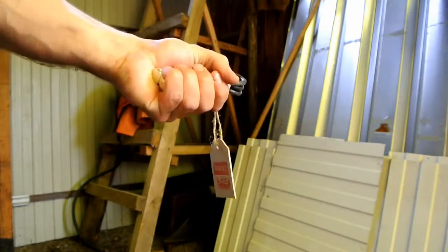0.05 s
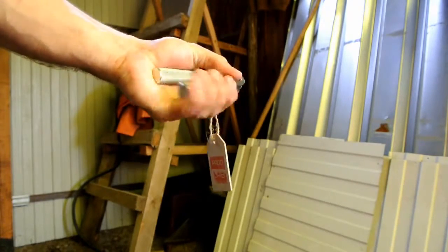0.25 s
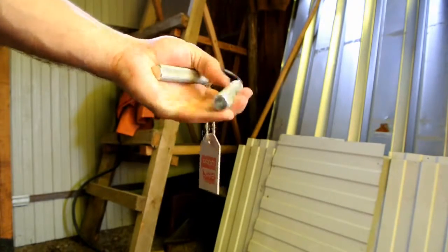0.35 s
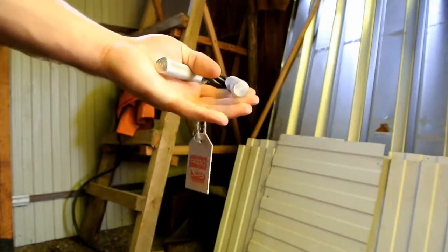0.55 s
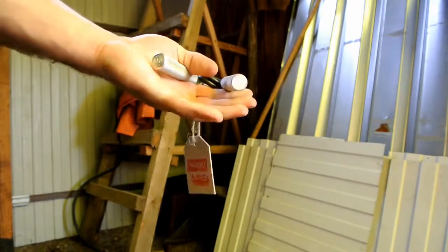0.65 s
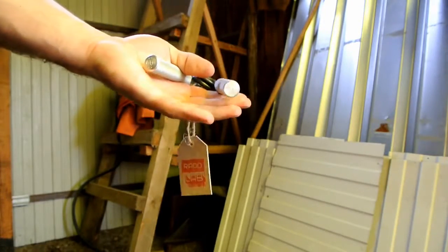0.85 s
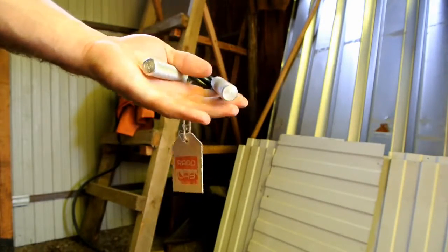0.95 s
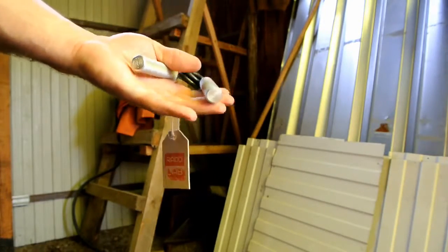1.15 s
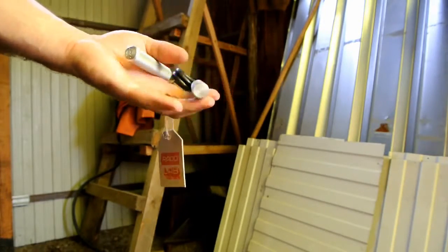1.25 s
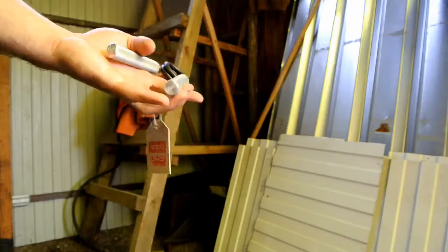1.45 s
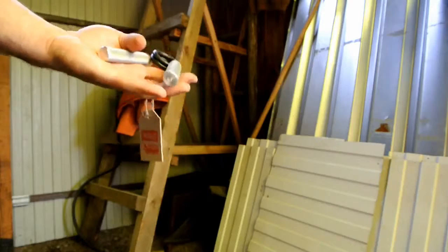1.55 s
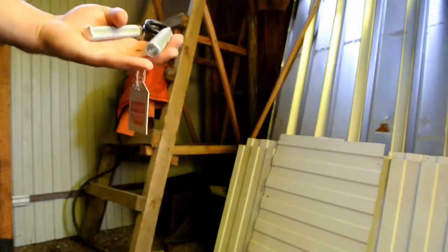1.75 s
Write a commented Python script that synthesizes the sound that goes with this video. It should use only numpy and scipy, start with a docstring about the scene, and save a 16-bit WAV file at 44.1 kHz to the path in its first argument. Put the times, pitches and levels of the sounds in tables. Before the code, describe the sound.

A metal hand gripper snaps once, sharp and close to the microphone, then its spring scrapes briefly and a handle ticks. A duller knock follows farther off in a quiet shed, over soft air and a low hum.

```python
"""A soft wash of air and a low wavering hum fill a quiet shed. Close to the microphone a metal
hand gripper is let go: a handle ticks, the spring snaps once sharply, then scrapes in tiny slips
as the handles open with a fainter tick. Farther off, a duller knock sets a body ringing and
dies away. Last come two faint, thin squeaks as the gripper shifts on the palm."""
import sys
import numpy as np
from scipy import signal
from scipy.fft import rfft, irfft
from scipy.io import wavfile
from scipy.ndimage import uniform_filter1d

SR = 44100
rng = np.random.default_rng(int(sys.argv[2]) if len(sys.argv) > 2 else 0)


def output_pcm(signal):
    """Save a mono or channel-first signal as 16-bit PCM at the path in sys.argv[1].

    Samples are clipped to [-1, 1] before scaling.
    """
    pcm = np.clip(np.atleast_2d(signal).T, -1, 1) * 32767
    wavfile.write(sys.argv[1], SR, np.round(pcm).astype(np.int16))


N = 79380
T = np.arange(N) / SR

# Spectra of the air, the shed's tail and each source. Each row: frequency in Hz, relative level in dB.
AIR_COLOUR = [(20, -3.5), (45, -8.5), (85, -9), (150, -13), (210, -10.5), (290, -4.5), (380, -12),
              (560, -7.5), (800, -9.5), (1200, -13.5), (2400, -21), (5000, -22.5), (8000, -24),
              (14500, -24.5), (16000, -31)]
SHED_COLOUR = [(200, 13), (3000, -6.5), (5500, 4.5), (8500, -4), (12000, -8), (16000, -3.5)]
CLATTER_COLOUR = [(60, -25), (120, -16), (190, -4.5), (330, -4), (480, 0.5), (680, -1.5), (1120, -8.5),
                  (1560, -2.5), (3100, -5.5), (5400, -13.5), (7500, -17), (13000, -23), (16000, -33)]
CRACK_COLOUR = [(200, -4), (700, -24), (1150, -19), (1600, 1), (2400, -4), (3100, 8.5), (4200, 1.5),
                (6000, -9), (9000, -25), (13000, -17), (16000, -28)]
SCRAPE_COLOUR = [(300, -24), (900, -22), (1300, -16), (1550, -19), (1950, -11), (3100, -19), (4300, -13.5),
                 (5600, -13), (6900, -3), (9800, -3), (12800, 3), (16000, -6)]
TICK_COLOUR = [(200, -35), (1000, -5), (1700, 6), (2400, 4), (3300, 2), (5500, -30), (16000, -39)]
SNAP_COLOUR = [(200, -32), (1400, -24.5), (3800, -15), (6200, -16), (8600, -2), (12500, 4), (16000, -5)]
# Stereo image at the microphone. Each row: frequency in Hz, left-right likeness from 0 to 1.
AIR_LIKENESS = [(40, 0.74), (300, 0.7), (700, 0.7), (1500, 0.26), (4000, 0.12), (15000, 0.1)]
SHED_LIKENESS = [(200, 1), (2000, .4), (8000, 0.078), (16000, .1)]
KNOCK_LIKENESS = [(100, .95), (300, 0.98), (640, 0.92), (1400, 0.74), (3100, 0.38), (7000, 0), (15000, 0)]
# Decay of the shed's tail and the knock's clatter. Each row: frequency in Hz, seconds to fall 60 dB.
SHED_T60 = [(200, 0.53), (2000, 0.25), (8000, 0.21), (16000, 0.12)]
CLATTER_T60 = [(150, 0.62), (500, 0.32), (1500, .24), (3000, 0.27), (7000, 0.3), (15000, 0.15)]
# Rise and fall of the air, the hum and the scrape. Each row: time in seconds, gain in dB.
AIR_SWELL = [(0, -5.5), (.17, 0.5), (.4, -.5), (.76, -2), (.88, -1.5), (1.18, 0.5), (1.3, -2), (1.44, -2.5),
             (1.55, 1), (1.63, -2.5), (1.8, 0.5)]
HUM_SWELL = [(0, -1.5), (.6, -2.5), (.77, 2.5), (.9, -6), (1.12, -2), (1.45, -3), (1.6, -17.5), (1.68, 2),
             (1.8, 4)]
SCRAPE_SWELL = [(.37, -66), (.42, -54), (.436, -43), (.4445, -39.5), (.4465, -29.5), (.4585, -30),
                (.461, -41), (.482, -48), (.495, -60), (.56, -58), (.6, -75)]
# How far each band of air follows the swell. Each row: frequency in Hz, share of the swell.
SWELL_SHARE = [(20, 0.42), (1200, 0.71), (3000, 0), (16000, 0.22)]
# The shed's low hum. Each row: frequency in Hz, width in Hz, level before its swell in dB.
HUM_TONES = [(266, 21.4, -52.5), (533.4, 17, -59.5)]
# Low drones. Each row: middle in seconds, length in seconds, frequency in Hz, peak level in dB.
DRONES = [(.04, 0.16, 72, -49.5), (0.218, 0.66, 73, -52.5), (0.748, 0.31, 86, -52),
          (1.583, 0.41, 112, -53.5)]
# Echoes off nearby surfaces. Each row: delay in seconds, left gain in dB, right gain in dB.
ECHOES = [(.0062, -40, -22), (.0116, -25, -40), (.0147, -30, -34), (.0194, -27, -40)]
# Ring of the knocked body, the spring and a handle.
# Each row: frequency in Hz, relative level in dB, seconds to fall 60 dB.
BODY_MODES = [(288.3, -2, 0.41), (514, -7, 0.29), (647, -0.5, 0.21), (1352, -3, .28), (1550, 5, 0.16),
              (1724, -5.5, 0.24), (2150, -5, 0.31), (2155, -16, 0.16), (2410, -17, 0.1), (2700, -4, 0.076),
              (2993, 5, 0.063), (3076, 0.5, 0.21), (3140, 6, 0.067), (3809, -11, 0.12)]
SPRING_MODES = [(1560, -17, .035), (4050, -25, .05), (4400, -23, .05), (11420, -18, .06), (12480, -18, .04),
                (13700, -19, .04)]
HANDLE_MODES = [(1690, -16, 0.0075), (2320, -20.5, 0.021), (3240, -20.5, 0.014)]
# Squeaks on the palm. Each row: start and length in seconds, first and last pitch in Hz, level in dB.
SQUEAKS = [(1.395, .055, 12400, 16000, -56), (1.49, .09, 13900, 15800, -58)]
# Handle ticks. Each row: start in seconds, gain in dB, left over right in dB, bright edge in dB.
TICKS = [(0.1844, -19.5, -2.5, -32), (0.5471, -30.5, 1, 7.5)]
# The spring's snap and rebounds. Each row: start in seconds, energy in dB, left over right in dB.
SNAPS = [(.20497, 5.8, 1), (.2056, -8, 10), (.2066, -14, 6)]


def amp(db):
    """Decibels to gain."""
    return 10 ** (np.asarray(db) / 20)


def unit(x):
    """Scales to rms 1."""
    return x / np.sqrt(np.mean(x ** 2) + 1e-20)


def read(points, hz):
    """Reads a table on a log-frequency axis."""
    f, value = np.transpose(points)
    return np.interp(np.log(hz + 1), np.log(f + 1), value)


def pan(db):
    """Stereo gains that put the left this many dB over the right."""
    return amp([[db / 2], [-db / 2]])


def add(mix, start_s, sound):
    """Adds a sound to the stereo mix at a time."""
    part = mix[:, round(start_s * SR):][:, :sound.shape[-1]]
    part += sound[..., :part.shape[1]]


def impulse(colour):
    """The shortest causal click with this spectrum, of energy 1."""
    log_gain = np.log(amp(read(colour, abs(np.fft.fftfreq(2048, 1 / SR)))))
    minimum_phase = np.exp(np.conj(signal.hilbert(log_gain)))
    click = np.fft.ifft(minimum_phase).real
    return click / np.linalg.norm(click)


def sine(hz, shift_rad=0):
    """A steady tone of random phase."""
    return np.sin(2 * np.pi * (hz * T + rng.random()) + shift_rad)


def ring(modes):
    """Struck modes, each dying from its own level."""
    return sum(amp(db - 60 * T / t60) * sine(hz) for hz, db, t60 in modes)


def noise(colour, likeness):
    """Stereo noise of rms 1 with a spectrum and a left-right likeness."""
    hz = np.fft.rfftfreq(N, 1 / SR)
    mid, side = rfft(rng.standard_normal((2, N)))
    same = read(likeness, hz)
    mid, side = mid * np.sqrt(1 + same), side * np.sqrt(1 - same)
    return unit(irfft(np.array([mid + side, mid - side]) * amp(read(colour, hz)), N))


def die_away(x, t60s):
    """Lets each band decay at its own speed."""
    hz, t, bands = signal.stft(x, SR, nperseg=256)
    decay = amp(-60 * t / read(t60s, hz)[:, None])
    return signal.istft(bands * decay, SR, nperseg=256)[1][:, :N]


def air(level_db=-45.5, patch_db=1.5):
    """A wash of air around the microphone, swelling gently and drifting in small patches."""
    hz, t, bands = signal.stft(noise(AIR_COLOUR, AIR_LIKENESS), SR, nperseg=1024)
    patches = uniform_filter1d(rng.standard_normal(bands.shape[1:]), size=10, axis=0)
    patches = unit(uniform_filter1d(patches, size=8, axis=1))
    swell_db = read(SWELL_SHARE, hz)[:, None] * np.interp(t, *np.transpose(AIR_SWELL))
    wash = signal.istft(bands * amp(patch_db * patches + swell_db))[1][:, :N]
    return amp(level_db) * unit(wash)


def hum():
    """Two narrow bands of noise, heard as a low hum wavering in level and pitch."""
    out = np.zeros(N)
    for hz, width_hz, db in HUM_TONES:
        offset = (np.fft.rfftfreq(N, 1 / SR) - hz) / width_hz
        band = rfft(rng.standard_normal(N)) * np.exp(-2 * offset ** 2)
        out += amp(db) * unit(irfft(band, N))
    return out * amp(np.interp(T, *np.transpose(HUM_SWELL)))


def drones():
    """Deep tones that each swell and fade once."""
    out = np.zeros(N)
    for middle_s, length_s, hz, db in DRONES:
        arch = np.cos(np.pi * np.clip((T - middle_s) / length_s, -.5, .5))
        out += amp(db) * arch * sine(hz)
    return out


def shed(source, tail_db=-1):
    """What the shed returns to the microphone: a few close echoes and a short diffuse tail."""
    room = die_away(noise(SHED_COLOUR, SHED_LIKENESS), SHED_T60)
    room *= amp(tail_db) / np.linalg.norm(room[0])
    for delay_s, left_db, right_db in ECHOES:
        add(room, delay_s, amp([[left_db], [right_db]]))
    return signal.fftconvolve(source.mean(0)[None], room)[:, :N]


def knock(start_s=.9838, rise_s=.0042, clatter_db=-24.5, crack_db=-23, crack_t60_s=.08, ring_db=-34):
    """A blow farther off in the shed: a short crack, the body's modes and a dense dying clatter."""
    clatter = amp(clatter_db) * die_away(noise(CLATTER_COLOUR, KNOCK_LIKENESS), CLATTER_T60)
    crack = amp(crack_db - 60 * T / crack_t60_s) * noise(CRACK_COLOUR, KNOCK_LIKENESS)
    body = np.zeros((2, N))
    for hz, db, t60 in BODY_MODES:
        # Opposite phase shifts left and right widen the higher modes.
        shift_rad = np.arccos(read(KNOCK_LIKENESS, hz)) * rng.choice([-.5, .5])
        body += amp(ring_db + db - 60 * T / t60) * sine(hz, [[shift_rad], [-shift_rad]])
    attack = np.minimum(T / rise_s, 1) ** 2
    out = np.zeros((2, N))
    add(out, start_s, (clatter + crack + body) * attack)
    return out


def squeaks(flutter_depth=.35):
    """Thin, broken upward glides as the gripper shifts on the palm."""
    out = np.zeros((2, N))
    for start_s, length_s, first_hz, last_hz, db in SQUEAKS:
        progress = np.linspace(0, 1, round(length_s * SR))
        cycles = np.cumsum(first_hz + (last_hz - first_hz) * progress) / SR
        jitter = unit(uniform_filter1d(rng.standard_normal(N), size=200))[:len(progress)]
        arch = 2 * np.sqrt(progress * (1 - progress))
        add(out, start_s, amp(db) * arch * (1 + flutter_depth * jitter) * np.sin(2 * np.pi * cycles))
    return out


def scrape(slips_per_s=3600, spread_db=2.5, likeness=.69, pan_db=2.8):
    """The spring slides, close and a little left: dense tiny slips of metal on metal ring its coil."""
    slips = (rng.random((3, N)) < slips_per_s / SR) * rng.choice([-1, 1], (3, N))
    strength_db = spread_db * np.minimum(rng.exponential(1, (3, N)), 3)
    slips = unit(slips * amp(strength_db))
    # One train of slips reaches both channels; each also has its own.
    friction = np.sqrt(likeness) * slips[0] + np.sqrt(1 - likeness) * slips[1:]
    friction *= amp(np.interp(T, *np.transpose(SCRAPE_SWELL)))
    coil = sum(amp(db) * unit(ring([(hz, 0, t60)])) for hz, db, t60 in SPRING_MODES) / np.sqrt(N)
    rub = signal.fftconvolve(friction, impulse(SCRAPE_COLOUR)[None])[:, :N]
    ringing = signal.fftconvolve(friction, coil[None])[:, :N]
    return pan(pan_db) * (rub + ringing)


def ticks():
    """Soft ticks of the handles: a dull click, a brief ring and some of the snap's bright edge."""
    out = np.zeros((2, N))
    click, edge = impulse(TICK_COLOUR), impulse(SNAP_COLOUR)
    tick = click + ring(HANDLE_MODES)[:len(click)]
    for start_s, db, pan_db, edge_db in TICKS:
        add(out, start_s, amp(db) * pan(pan_db) * (tick + amp(edge_db) * edge))
    return out


def snap():
    """The spring snaps right at the microphone: one bright click and two tiny rebounds."""
    out = np.zeros((2, N))
    click = impulse(SNAP_COLOUR)
    for start_s, db, pan_db in SNAPS:
        add(out, start_s, amp(db) * pan(pan_db) * click)
    return out


def scene():
    """The quiet shed behind, the knock farther off, the gripper up close with its reflections."""
    background = pan(db=.5) * (air() + hum() + drones())
    gripper = ticks() + snap() + scrape()
    return background + knock() + squeaks() + shed(gripper) + gripper


def record(dry, cutoff_hz=15850):
    """The recorder's band limit cuts the highest treble."""
    lowpass = signal.firwin(511, cutoff_hz, window=("kaiser", 9), fs=SR)
    return signal.oaconvolve(dry, lowpass[None], "same")


dry = scene()
out = record(dry)
output_pcm(out)
```